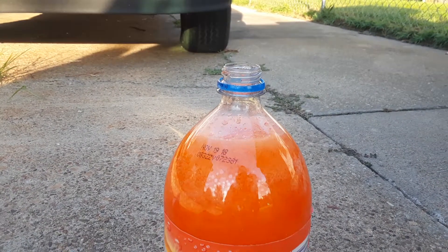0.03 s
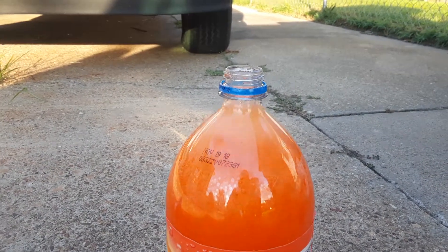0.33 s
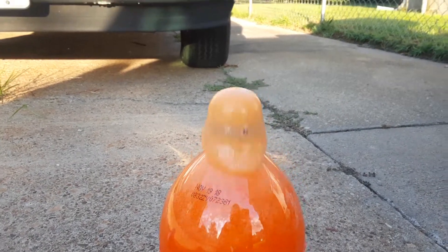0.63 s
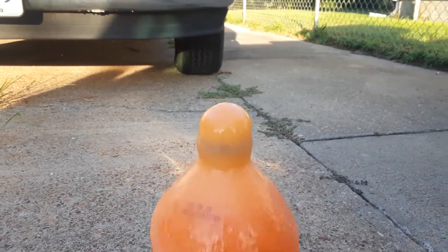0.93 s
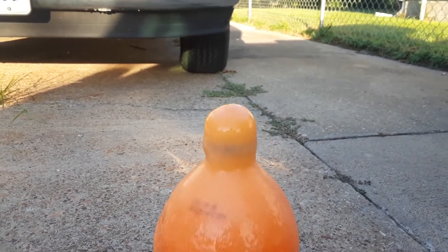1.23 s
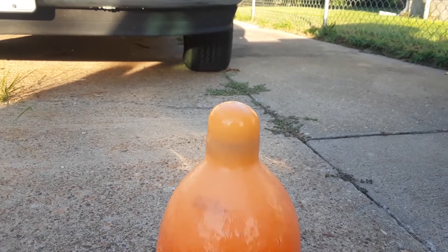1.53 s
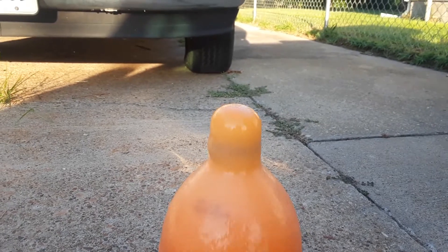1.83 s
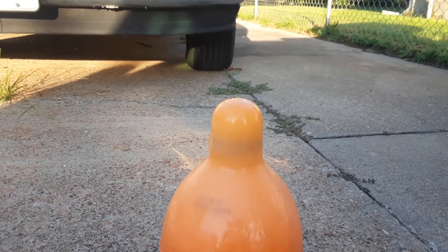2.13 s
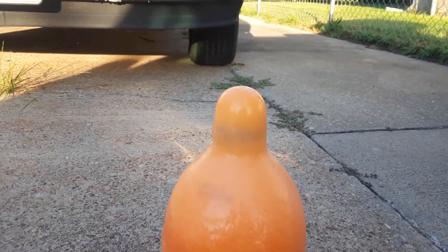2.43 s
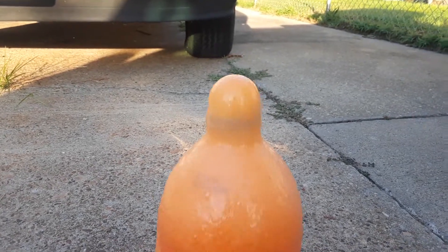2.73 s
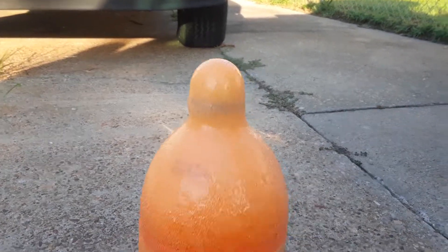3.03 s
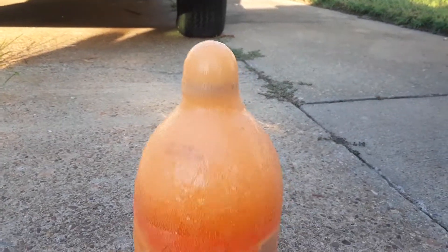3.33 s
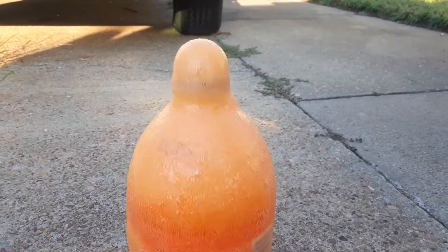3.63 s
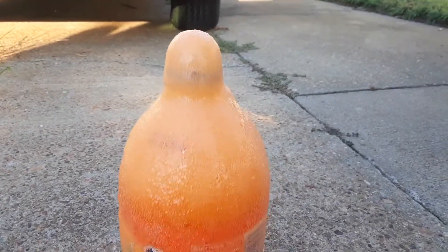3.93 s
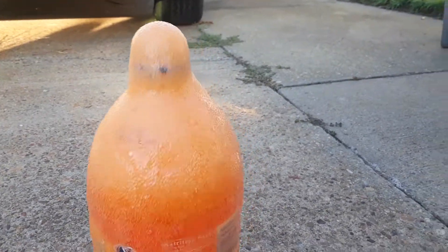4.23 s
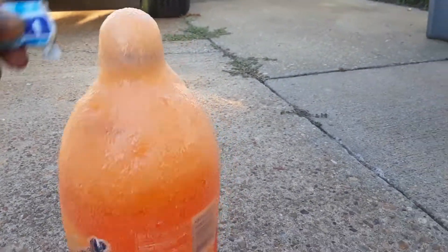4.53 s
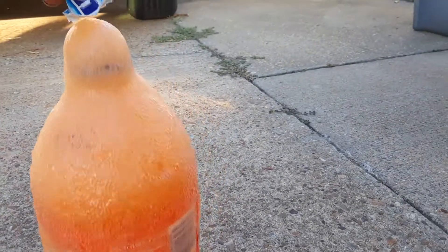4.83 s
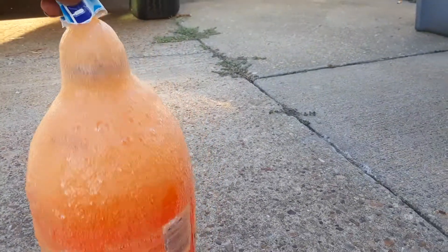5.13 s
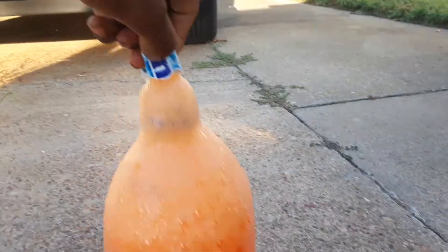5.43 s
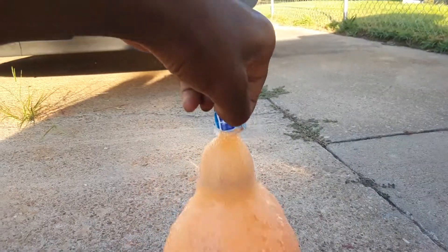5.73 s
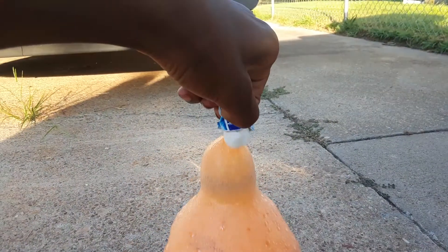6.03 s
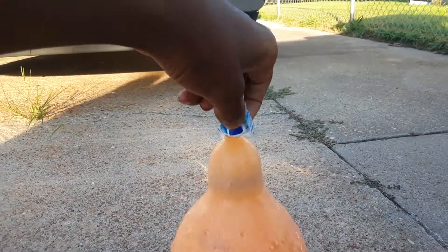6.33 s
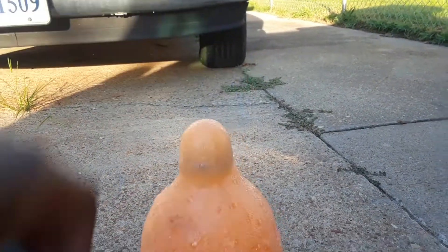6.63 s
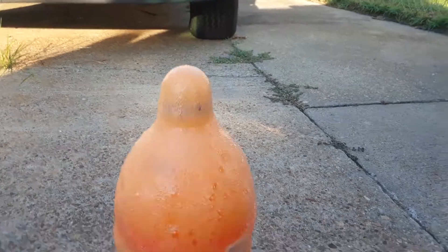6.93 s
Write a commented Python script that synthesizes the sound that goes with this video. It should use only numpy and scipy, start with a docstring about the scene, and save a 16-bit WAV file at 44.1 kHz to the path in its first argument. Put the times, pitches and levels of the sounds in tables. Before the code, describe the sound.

Soda foams up out of a plastic bottle close to the microphone and keeps fizzing softly, with a few tiny spurts of bursting bubbles. As the foam slowly thins, a small plastic wrapper rustles and crackles, with one sharp snap near the end. Then something brushes past the microphone. Outdoors on a driveway, high insects sing faintly and distant traffic rumbles throughout. The right side sounds muffled.

```python
"""Soda foaming over on a driveway

Close up, soda erupts from a plastic bottle and keeps fizzing as its bubbles burst. A hand brings a
small wrapper to the neck; thin plastic rustles, buckles and snaps. Insects sing in the yard and
traffic rumbles far off. At the end something brushes close past the stereo pair of microphones,
of which the right one is muffled."""
import sys
import numpy as np
from scipy import signal
from scipy.fft import rfft, irfft
from scipy.io import wavfile

SR = 44100
rng = np.random.default_rng(int(sys.argv[2]) if len(sys.argv) > 2 else 0)


def generate_wav(signal):
    """Clip the signal to [-1, 1] and save it as 16-bit WAV at the path in sys.argv[1]."""
    frames = np.transpose(np.atleast_2d(signal))
    scaled = np.clip(frames, -1, 1) * 32767
    pcm = np.round(scaled).astype(np.int16)
    wavfile.write(sys.argv[1], SR, pcm)


N = 313110
TIME = np.arange(N) / SR


def foam(erupt_s=0.74, spent_s=3.24):
    """Thousands of tiny bubbles burst each second. The foam erupts, spreads, then thins and coarsens."""
    # spectrum of the bursting foam: (frequency [Hz], gain [dB])
    foam_colour = [(300, -25), (800, -3), (1400, 1), (2600, 1.7), (4000, -.5), (5500, -1.6), (7200, 1.7),
                   (8300, 2), (9200, -4.5), (10200, -4.4), (12600, -1.9), (15800, -3.8)]
    full_db, inside_db = -51, -21  # the fizz is quieter while still in the bottle
    fresh_db, spread_s = -6, 0.57  # it starts low and grows as the foam spreads
    thin_db_per_s, coarsen_db_per_s = 0.84, 5.5  # spent foam thins and its bubbles merge
    age = np.maximum(TIME - erupt_s, 0)
    spent = np.maximum(TIME - spent_s, 0)
    exposed = amp(inside_db) + (1 - amp(inside_db)) * rise(erupt_s, rise_s=0.033)
    level = exposed * amp(full_db + fresh_db * np.exp(-age / spread_s) - thin_db_per_s * spent)
    fine = grains(per_s=16000, spread_db=2.5) * amp(0.83 * drift(per_s=32))
    ticks = amp(-21.5) * grains(per_s=260, spread_db=4.5)
    # the large bubbles go in spurts and sound lower
    large = grains(per_s=1500, spread_db=2.5) * amp(2.0 * drift(per_s=13))
    large = unit(colour(large, [(700, 0), (1800, -1), (5000, 0.5), (10000, -14.0)]))
    large_share = amp(np.minimum(-17.5 + coarsen_db_per_s * spent, -4))
    return unit(colour(fine + ticks + large_share * large, foam_colour)) * level


def pops(half_s=0.0022):
    """Now and then a clump of large bubbles gives way in one brief spurt."""
    # collapsing clumps: (time [s], level [dB])
    collapses = [(1.072, -48), (1.193, -50), (1.682, -44.5), (2.821, -47)]
    # spectrum of a collapse: (frequency [Hz], gain [dB])
    pop_colour = [(500, -25), (1500, 0), (3500, 0), (7500, -4), (10000, -14), (15500, -14)]
    level = sum(amp(db) * swell(s, half_s) for s, db in collapses)
    return level * unit(colour(grains(per_s=9000, spread_db=2.5), pop_colour))


def plastic():
    """Plastic crackles and the wrapper rustles, close by; the crackles echo faintly in the yard."""
    # buckling folds: (time [s], strength [dB], band bottom [Hz], band top [Hz])
    folds = [(3.3948, -27, 4300, 8000), (4.185, -17, 2400, 8000), (4.1872, -10.5, 2720, 3260),
             (4.189, -21, 2800, 16000), (4.193, -18.5, 3070, 3400), (4.1937, -14, 4500, 16000),
             (5.517, -25, 1800, 2900), (5.5174, -25.5, 9900, 17300), (6.1662, -15, 890, 7300),
             (6.1694, -20, 600, 6000), (6.1846, -19.5, 650, 9000), (6.3592, -0.5, 1010, 14000),
             (6.4407, -23, 1500, 7400), (6.481, -29, 3000, 9000), (6.487, -18.5, 2700, 9000),
             (6.5573, -25, 1190, 4470), (6.8576, -26, 1600, 5000), (6.8804, -16.5, 880, 8650),
             (6.9394, -25, 500, 3000), (7.007, -23, 4000, 14000)]
    # soft rubs of the wrapper: (time [s], half length [s], level [dB])
    rubs = [(4.193, 0.014, -40), (6.066, 0.019, -43.5), (6.876, 0.021, -41), (6.99, 0.061, -44.5)]
    # spectrum of the rubbing: (frequency [Hz], gain [dB])
    rustle_colour = [(400, -1), (1500, -4.5), (3000, 7), (4500, -2), (8000, -3), (9500, -15), (12500, -2.5),
                     (15500, -11)]
    snaps = np.zeros(N)
    for s, *shape in folds:
        add(snaps, s, crackle(*shape))
    rubbing = sum(amp(db) * swell(s, half_s) for s, half_s, db in rubs)
    rustle = rubbing * unit(colour(grains(per_s=18000, spread_db=5.5), rustle_colour))
    balance = amp([[0], [1]])  # left, right
    return (snaps + rustle) * balance + amp(-18.5) * yard_echo(snaps)


def crackle(strength_db, low_hz, high_hz):
    """Thin plastic buckles: a crack, noisy crumpling and a brief ring, longer and cleaner if hard."""
    # modes of the plastic: (frequency [Hz], relative level [dB], nominal 60 dB decay time [s])
    modes = [(1050, -14, .012), (2100, -5, .012), (2750, -1, .014), (3480, -3, .012), (4650, -1, .01),
             (5350, -3, .01), (6850, 1, .009), (7600, 1.5, .009), (8350, 0, .009), (10950, -7, .007),
             (13600, -8.5, .006)]
    fold_to_snap_db = (-9, 1.5)  # strengths from a gentle fold to a full snap-through
    ring_scale = np.interp(strength_db, fold_to_snap_db, (0.72, 1.15))
    crumple_share = np.interp(strength_db, fold_to_snap_db, (0.79, 0.11))
    t = np.arange(2048) / SR
    ring = sum(amp(db - 60 * t / (t60 * ring_scale)) * np.sin(2 * np.pi * (hz * t + rng.random()))
               for hz, db, t60 in modes)
    crumple = colour(rng.standard_normal(len(t)),
                     [(300, 8.5), (900, 6.0), (8300, 6), (9500, -17), (12500, 3), (16000, 1.5)])
    crumple *= amp(-60 * t / (.017 * ring_scale)) + 1.5 * amp(-60 * t / (.003 * ring_scale))
    snap = np.sqrt(1 - crumple_share) * unit(ring) + np.sqrt(crumple_share) * unit(crumple)
    band = signal.butter(2, [low_hz, high_hz], "bandpass", fs=SR, output="sos")
    return amp(strength_db - 21.5) * np.sqrt(ring_scale) * unit(signal.sosfilt(band, snap))


def brush(start_s=6.933, fade_db_per_s=12):
    """Sliding friction close to the pair, nearer the right microphone: it sets in fast, then dulls."""
    # spectrum of the friction: (frequency [Hz], gain [dB])
    brush_colour = [(60, -33), (120, -8), (175, 2.5), (270, -15), (370, -0.5), (560, 0), (850, -11),
                    (1800, -7), (3200, -13), (6000, -23.5), (8300, -27), (9600, -44), (15500, -50)]
    hz, frame_s, spectra = signal.stft(diffuse(brush_colour), SR, nperseg=256)
    elapsed = np.maximum(TIME - start_s, 0)
    tilt_db_per_octave = 1.5 - 18 * np.interp(frame_s, TIME, elapsed)
    octaves = np.log2(np.maximum(hz, 300) / 700)
    spectra *= amp(octaves[:, None] * tilt_db_per_octave)
    level = rise(start_s, rise_s=0.014) * amp(-32 - fade_db_per_s * elapsed + 1.4 * drift(per_s=110))
    left, right = signal.istft(spectra, SR, nperseg=256)[1][:, :N] * level
    return np.array([left, colour(right, [(200, 1.1), (900, 0.59), (2500, 4.6), (4500, 8), (8000, 2.5)])])


def insects():
    """Out in the yard, a wavering chorus near 7 kHz and one insect that chirps, weakens and stops."""
    # resonances of the chorus: (frequency [Hz], width [Hz], gain [dB])
    chorus_modes = [(7170, 700, 18), (6900, 900, 1)]
    # resonances of the lone insect: (frequency [Hz], width [Hz], gain [dB])
    chirp_modes = [(6700, 250, -6), (7000, 310, -3), (7600, 300, -12), (8760, 460, -18), (9570, 150, -17)]
    chorus = rasp(chorus_modes) * amp(-55.0 + 0.18 * drift(per_s=7.2) + 1.27 * drift(per_s=70))
    return chorus + chirps(count=14) * rasp(chirp_modes)


def chirps(count, first_s=0.16, period_s=0.249, half_s=0.043, tired_s=2.5, fade_db_per_s=5):
    """Envelope of an even run of chirps, each a little louder or softer, fading from tired_s on."""
    times = first_s + period_s * np.arange(count)
    levels_db = -57.5 - fade_db_per_s * np.maximum(times - tired_s, 0) + rng.standard_normal(count)
    return sum(amp(db) * np.exp(-np.abs((TIME - s) / half_s) ** 3) for s, db in zip(times, levels_db))


def traffic(road_db=-58.5):
    """A far road: low rumble, tyre roar that swells as vehicles pass, engine drones and whines."""
    # spectrum of the rumble: (frequency [Hz], gain [dB])
    rumble_colour = [(20, -49), (35, -22), (55, -12.5), (90, -2), (125, -0.5), (170, -4.5), (240, -9.5),
                     (340, -15.5), (450, -37), (900, -49), (3000, -70)]
    # course of the rumble: (time [s], relative level [dB])
    rumble_levels = [(0, -48), (.9, -50), (1.5, -47.5), (2.1, -49), (3.3, -47.5), (4.3, -50.5),
                     (5.3, -47.5), (6.2, -49), (6.7, -51)]
    # spectrum of the tyre roar: (frequency [Hz], gain [dB])
    roar_colour = [(60, -30), (160, -0.5), (250, 2.5), (350, 0), (450, -7), (700, -7.5), (1100, -12.5),
                   (2400, -16.5), (4000, -33), (9000, -53)]
    # passing vehicles: (nearest at [s], half length [s], level [dB])
    passes = [(4.0, 1.63, -53.5), (5.82, 0.28, -47), (6.42, 0.37, -47.5)]
    # engines: (pitch [Hz], wander [share of pitch], loudest at [s], half length [s], level [dB])
    drones = [(115.4, 0.0087, 0.38, 0.48, -50), (120.5, 0.0068, 6.75, 4.5, -51.5),
              (64, 0.019, 5.33, 1.55, -55.5), (401, 0.012, 4.1, 0.37, -60), (481, 0.02, 4.54, 1.02, -66)]
    # whines of traffic: (frequency [Hz], width [Hz], loudest at [s], half length [s], level [dB])
    whines = [(860, 130, 0.22, .17, -65), (325, 87, 2.9, 0.84, -59), (220, 54, 4.3, 1.2, -56.5),
              (310, 52, 5.55, 0.24, -54.5), (255, 50, 5.85, 0.11, -48.5), (737, 250, 6.22, 0.42, -56),
              (990, 74, 6.7, 0.69, -56)]
    road = diffuse(rumble_colour) * amp(np.interp(TIME, *np.transpose(rumble_levels)) + 0.5)
    roar_power = amp(road_db) ** 2 + sum(amp(db) ** 2 * swell(s, half_s) for s, half_s, db in passes)
    road += diffuse(roar_colour) * np.sqrt(roar_power)
    for hz, wander, s, half_s, db in drones:
        turns = np.cumsum(hz * (1 + wander * drift(per_s=7.9))) / SR
        level = amp(db + 0.67 * drift(per_s=23)) * swell(s, half_s)
        road += np.sqrt(2) * level * np.sin(2 * np.pi * turns)
    for hz, width, s, half_s, db in whines:
        road += amp(db) * swell(s, half_s) * rasp([(hz, width, 0)])
    return road


def yard_echo(x, t60_s=0.14):
    """Scattered echoes from the ground, the car and the house."""
    t = np.arange(SR // 3) / SR
    taps = rng.standard_normal((2, len(t))) * amp(-60 * t / t60_s)
    taps = colour(taps, [(300, -6), (1500, 9.5), (2700, 8.0), (4000, -2), (5600, 5.5), (8000, -1),
                         (15000, -53)])
    return signal.fftconvolve(x[None], taps / np.linalg.norm(taps[0]), axes=1)[:, :N]


def yard_air():
    """The steady hush of open air, from all around."""
    # spectrum of the air: (frequency [Hz], gain [dB])
    air_colour = [(200, -15), (500, -1.5), (850, 0.5), (1400, -1), (2800, -5), (3800, -5.5), (5300, -9),
                  (8200, -5.5), (9300, -34), (10500, -54), (16000, -40)]
    return amp(-58.5) * diffuse(air_colour)


def diffuse(points):
    """Coloured noise from all around, most alike at the two microphones in the bass."""
    # likeness of left and right: (frequency [Hz], correlation [0-1])
    likeness = [(60, 0.85), (130, 0.97), (290, 0.73), (450, 0.74), (640, 0.2), (900, 0.7), (1400, 0.8),
                (4000, 0.05)]
    left, other = rfft(rng.standard_normal((2, N)))
    same = read(likeness, np.fft.rfftfreq(N, 1 / SR))
    right = same * left + np.sqrt(1 - same ** 2) * other
    return unit(colour(irfft([left, right], N), points))


def grains(per_s, spread_db):
    """Tiny random impulses at each microphone, most small and a few large."""
    size = amp(spread_db * np.minimum(rng.exponential(1, (2, N)), 6))
    return unit(size * rng.choice([-1, 1], (2, N)) * (rng.random((2, N)) < per_s / SR))


def rasp(modes):
    """Noise in narrow resonances, given as (frequency [Hz], width [Hz], gain [dB])."""
    hz = np.fft.rfftfreq(N, 1 / SR)
    gain = sum(amp(db) / (1 + (2 * (hz - centre) / width) ** 4) for centre, width, db in modes)
    return unit(irfft(rfft(rng.standard_normal(N)) * gain, N))


def drift(per_s):
    """Smooth random wander of rms 1."""
    hz = np.fft.rfftfreq(N, 1 / SR)
    return unit(irfft(rfft(rng.standard_normal(N)) * np.exp(-(hz / per_s) ** 2) * (hz > 0), N))


def swell(s, half_s):
    """A bell curve that reaches 1 at time s."""
    return np.exp(-((TIME - s) / half_s) ** 2)


def rise(s, rise_s):
    """A smooth step from 0 to 1, half way up at time s."""
    return .5 + .5 * np.tanh((TIME - s) / (2 * rise_s))


def colour(x, points):
    """Filters x by a spectrum of (frequency [Hz], gain [dB])."""
    size = x.shape[-1]
    return irfft(rfft(x) * amp(read(points, np.fft.rfftfreq(size, 1 / SR))), size)


def read(points, hz):
    """Reads a spectrum on a log-frequency axis."""
    point_hz, value = np.transpose(points)
    return np.interp(np.log(hz + 1), np.log(point_hz + 1), value)


def amp(db):
    """Decibels to gain."""
    return 10 ** (np.asarray(db) / 20)


def unit(x):
    """Scales to rms 1."""
    return x / np.sqrt(np.mean(x ** 2) + 1e-20)


def add(mix, s, sound):
    """Mixes a sound in at time s."""
    part = mix[round(s * SR):][:len(sound)]
    part += sound[:len(part)]


def scene():
    """The bottle, the yard and the far road as they arrive at the two microphones."""
    return foam() + pops() + insects() + traffic() + plastic() + brush() + yard_air()


def record(dry):
    """The right microphone hears late and dull; both hiss, round off peaks and cut the top treble."""
    # response of the muffled right microphone: (frequency [Hz], gain [dB])
    muffled = [(170, 0), (350, -3), (600, -5), (1200, -11), (2500, -11.5), (3400, -18), (5000, -28),
               (7000, -42), (10500, -32), (13000, -19), (15500, -15.5)]
    # microphone self-noise: (frequency [Hz], gain [dB])
    hiss_colour = [(100, 6), (3000, 3), (6000, .3), (10500, -1), (13000, 3.5), (15500, 5.5)]
    lag_s, ceiling, edge_hz = 8 / SR, 0.85, 15950
    right = colour(np.interp(TIME - lag_s, TIME, dry[1]), muffled)
    heard = np.array([dry[0], right]) + amp(-73.0) * diffuse(hiss_colour)
    heard = ceiling * np.tanh(heard / ceiling)
    lowpass = signal.firwin(255, edge_hz, window=("kaiser", 9), fs=SR)
    return signal.oaconvolve(heard, lowpass[None], "same")


dry = scene()
out = record(dry)
generate_wav(out)
```